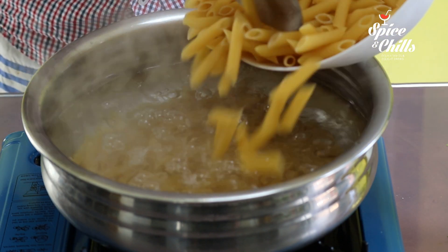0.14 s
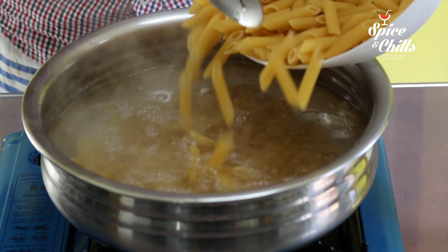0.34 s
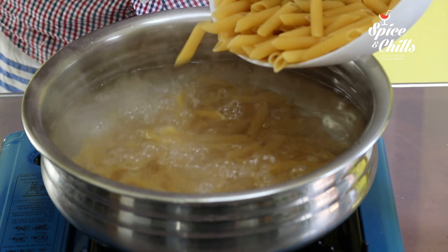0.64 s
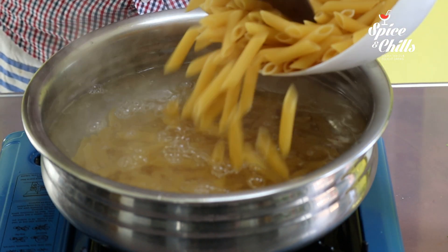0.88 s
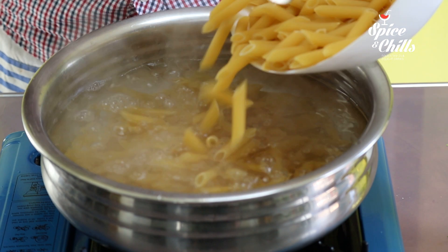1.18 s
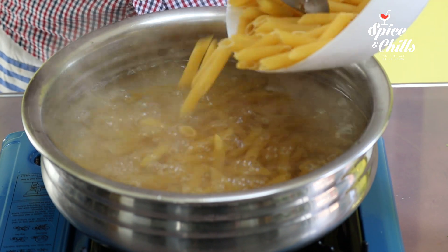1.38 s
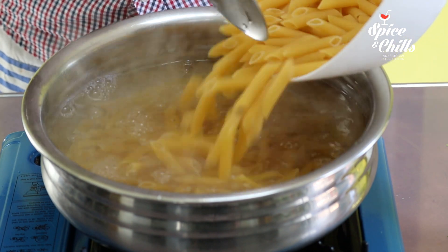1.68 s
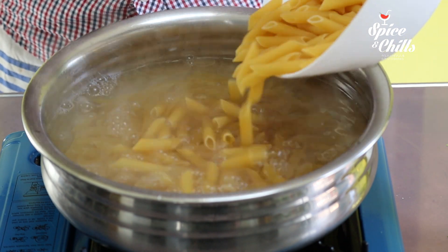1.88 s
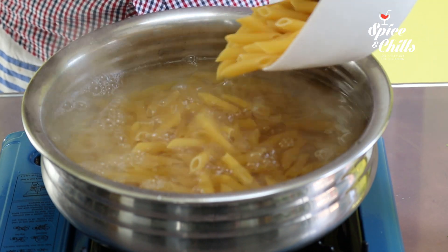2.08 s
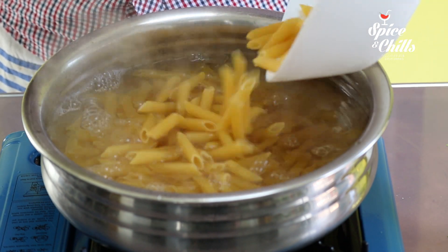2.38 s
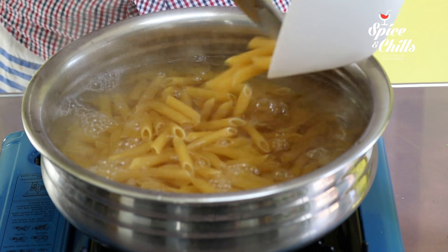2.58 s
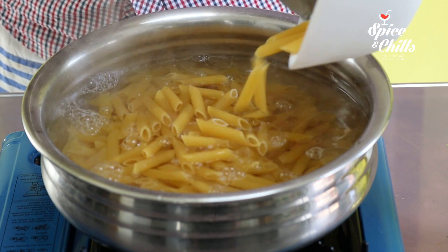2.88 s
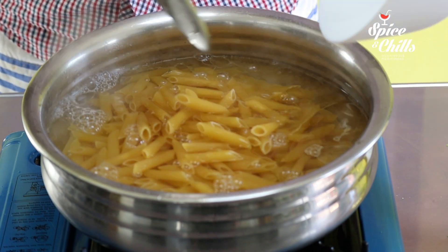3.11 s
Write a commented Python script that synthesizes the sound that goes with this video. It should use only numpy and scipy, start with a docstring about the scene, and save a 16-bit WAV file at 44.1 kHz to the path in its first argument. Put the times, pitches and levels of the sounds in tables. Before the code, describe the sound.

Dry pasta rattles, hollow and crisp, as a steel ladle pushes it into boiling water in waves from 0, 0.7 and 2.1 seconds. Bright irregular clinks and light splashes run over a faint low boil, with plops near 1.5-1.7 and short high squeaks around 2.5-2.8. Steel knocks ring at 2.6-2.7, and a strong one at 2.95 follows as pouring stops. Close microphone, hard-walled kitchen.

```python
"""Hard, hollow rattling in waves, bright steel ringing, splashes, plops and squeaks, and late steel knocks.
Dry penne is pushed with a steel ladle from a bowl into a steel pot of boiling water, in a hard-walled kitchen.
Random clicks through small resonators make the rattle and the splashes; modes struck by clicks make the steel.
Clear plops and short high squeaks are dying sines that rise in pitch; a noise tail that dies band by band
makes the room."""
import sys
import numpy as np
from scipy import signal
from scipy.fft import rfft, irfft
from scipy.io import wavfile

SR = 44100
rng = np.random.default_rng(int(sys.argv[2]) if len(sys.argv) > 2 else 0)


def dump_mix(stems):
    """Bounce the given channels to the path in sys.argv[1] as a 16-bit WAV at rate SR."""
    frames = np.atleast_2d(stems).T  # one column per channel
    limited = np.clip(frames, -1, 1)  # hard clip at full scale
    pcm = np.round(limited * 32767).astype(np.int16)
    wavfile.write(sys.argv[1], SR, pcm)


N = 143325
TIME = np.arange(N) / SR
STOP_S, STOP_DB_PER_S = 2.92, 110   # the last piece has fallen; slide and splash then die away at this rate

# Levels in the tables are relative; the mix gains of each layer come on top.
# pasta sliding out of the bowl, one list for each of three waves: (time [s], level [dB])
POUR_WAVES = [
    [(0.0, -24.5), (0.354, -25.5), (0.52, -38), (0.685, -30)],
    [(0.715, -22), (0.925, -21.5), (1.139, -17), (1.371, -36), (1.735, -22.5), (1.905, -25), (2.04, -33)],
    [(2.07, -29.5), (2.174, -21), (2.324, -24), (2.564, -34), (2.75, -26), (2.92, -47)],
]
# ringing modes of the steel ladle: (pitch [Hz], level [dB], T60 [s])
LADLE_MODES = [(2234, -16, 0.24), (2933, -4, 0.18), (3800, -10.5, 0.13), (4827, 0.5, .14), (5004, -3, 0.14),
               (6014, -5.5, 0.22), (7333, 1, .15), (7360, -1.5, 0.072), (7814, 1.5, 0.064),
               (8150, -4, 0.075), (8650, -1.5, 0.044), (8820, -13.5, 0.067), (10100, -10.5, 0.15),
               (11330, -14.5, 0.092), (11900, -27, 0.12), (12900, -17, 0.066), (13450, -43, .09)]
# colour of a hard crack on steel: (frequency [Hz], level [dB])
CRACK_COLOUR = [(30, -53), (150, -17), (340, -2.5), (600, -2.5), (1400, 5), (2500, 3.5), (5000, -1.5),
                (9000, 0), (16000, -19.5)]


def from_db(db):
    """Decibels to gain."""
    return 10 ** (np.asarray(db) / 20)


def rms_one(x):
    """Scale to rms 1."""
    return x / np.sqrt(np.mean(x ** 2) + 1e-20)


def at_hz(points, hz):
    """Read a table on a log-frequency axis."""
    f, value = np.transpose(points)
    return np.interp(np.log(hz + 1e-3), np.log(f), value)


def level(rows):
    """Gain over time from a level curve; it dies away once the pouring stops."""
    curve_db = np.interp(TIME, *np.transpose(rows))
    return from_db(curve_db - STOP_DB_PER_S * np.maximum(TIME - STOP_S, 0))


def colour(x, spectrum, size=4096):
    """Minimum-phase filter of unit energy with the given spectrum."""
    gain = from_db(at_hz(spectrum, np.linspace(0, SR / 2, size // 2 + 1)))
    cepstrum = irfft(np.log(gain))
    # folding the cepstrum onto positive times makes the response causal
    cepstrum[1:size // 2] *= 2
    cepstrum[size // 2 + 1:] = 0
    response = irfft(np.exp(rfft(cepstrum)))
    return signal.fftconvolve(x, response / np.linalg.norm(response))[:N]


def ring(x, hz, t60):
    """A two-pole resonator: a unit click sets a dying sine of height 1 ringing."""
    r = from_db(-60 / (t60 * SR))
    w = 2 * np.pi * min(hz, SR / 2) / SR
    return signal.lfilter([0, np.sin(w)], [1, -2 * r * np.cos(w), r * r], x + 1e-18)


def contacts(per_s, spread_db):
    """Random clicks of uneven size and random sign, rms 1."""
    sizes = from_db(spread_db * np.minimum(rng.exponential(1, N), 3))
    signs = rng.choice([-1, 1], N)
    happens = rng.random(N) < per_s / SR
    return rms_one(sizes * signs * happens)


def grains(clicks, low_hz, high_hz, cycles, count=48):
    """Each click rings one of many small resonators, which falls by 60 dB in a number of cycles; rms 1."""
    dealt = rng.integers(0, count, N)
    total = np.zeros(N)
    for k, hz in enumerate(np.geomspace(low_hz, high_hz, count)):
        total += hz * ring(clicks * (dealt == k), hz, cycles / hz)
    return rms_one(total)


def cluster(hz, count=4):
    """The close partials of one mode of an uneven steel shell."""
    half_width = .007   # share of the pitch, before the random shifts
    places = np.linspace(-1, 1, count) + rng.uniform(-.3, .3, count)
    return hz * (1 + half_width * places)


def struck(modes, times, db, uneven_db):
    """Blows on steel: the partials of a mode start in step, each with its own strength, and then beat."""
    out = np.zeros(N)
    at = (times * SR).astype(int)
    for hz, mode_db, t60 in modes:
        sign = rng.choice([-1, 1], len(times))
        for partial_hz in cluster(hz):
            clicks = np.zeros(N)
            strength_db = db + mode_db + uneven_db * rng.standard_normal(len(times))
            clicks[at] = sign * from_db(strength_db)
            out += ring(clicks, partial_hz, t60)
    return out / 2


def bursts(times, db, t60):
    """A short burst of noise at each time, dying exponentially."""
    clicks = np.zeros(N)
    clicks[(times * SR).astype(int)] = from_db(db)
    envelope = signal.lfilter([1], [1, -from_db(-60 / (t60 * SR))], clicks + 1e-18)
    return envelope * rng.standard_normal(N)


def kitchen(x, wet_db, first_s=.004, count=12):
    """Hard walls: the sound plus a diffuse noise tail that dies band by band."""
    # reverberation time of the room: (frequency [Hz], T60 [s])
    room_t60 = [(150, 0.23), (600, 0.59), (2000, 0.54), (5000, 0.83), (9000, .42), (15000, 0.24)]
    t, tail = TIME[:SR * 2 // 3], 0
    edges = np.geomspace(80, 18000, count + 1)
    for low, high in zip(edges, edges[1:]):
        band_filter = signal.butter(2, [low, high], "band", fs=SR, output="sos")
        band = signal.sosfilt(band_filter, rng.standard_normal(len(t)))
        decay = from_db(-60 * t / at_hz(room_t60, np.sqrt(low * high)))
        tail = tail + band * decay * (t > first_s)
    return x + from_db(wet_db) * signal.fftconvolve(x, tail / np.linalg.norm(tail))[:N]


def steady_boil():
    """Dense random clicks, filtered into the even rumble of boiling water."""
    # colour of the boil: (frequency [Hz], level [dB])
    boil_colour = [(20, -22), (55, -8.5), (110, -4.5), (175, 5), (260, -2.5), (550, -1), (1000, -3.5),
                   (2500, -12), (6000, -25), (10000, -22), (16000, -35)]
    return from_db(-43) * colour(contacts(per_s=5000, spread_db=1.5), boil_colour)


def splashes():
    """Swarms of small ringing bubbles; the air in the pot hums along at one resonance."""
    # pasta entering the water: (time [s], level [dB])
    splash_curve = [(0.0, -25.5), (0.11, -31.5), (0.82, -34), (1.02, -32), (1.14, -30.5), (1.96, -36.5),
                    (2.14, -34), (2.32, -33.5), (2.58, -31), (2.73, -48), (2.92, -40)]
    # colour of the splash: (frequency [Hz], level [dB])
    splash_colour = [(100, -23), (200, -3), (330, -4), (430, -10), (530, 0.5), (660, -5), (830, 3),
                     (1050, -3.5), (1400, 2), (2500, -8.5), (6000, -14.5)]
    bubbles = grains(contacts(per_s=450, spread_db=3.5), low_hz=285.8, high_hz=2550, cycles=18.7)
    spray = from_db(1) * contacts(per_s=1100, spread_db=-1.5)
    splash = rms_one(colour(bubbles + spray, splash_colour))
    hum = rms_one(ring(contacts(per_s=120, spread_db=3.5), hz=525.4, t60=0.13))
    return from_db(-0.5) * level(splash_curve) * (splash + from_db(-13.5) * hum)


def rising_tones(rows):
    """Each row sounds as a short dying sine that rises in pitch."""
    t60_s, rise_per_s, attack_s = 0.014, 2.2, 0.00047   # rise as a share of the first pitch
    out, t = np.zeros(N + SR), TIME[:SR // 10]
    attack = 1 - np.exp(-t / attack_s)
    for s, hz, db in rows:
        start = int(s * SR)
        decay = from_db(db - 60 * t / t60_s)
        tone = np.sin(2 * np.pi * hz * t * (1 + rise_per_s * t / 2))
        out[start:start + len(t)] += decay * attack * tone
    return out[:N]


def plops_and_squeaks():
    """Clear plops of bubbles near 3 kHz and short high squeaks of pasta at 8 to 9 kHz, all rising sines."""
    # the plops and squeaks: (time [s], first pitch [Hz], level [dB])
    tone_rows = [(1.331, 9390, -12.5), (1.538, 3304, -9.5), (1.675, 2770, -6.5), (1.696, 3010, -12.5),
                 (1.89, 2492, -15.5), (2.484, 2478, -15), (2.526, 2712, -12.5), (2.533, 8090, -14),
                 (2.54, 8300, -14), (2.653, 8600, -7.5), (2.782, 8900, -17.5), (2.7935, 9180, -12.5),
                 (2.862, 3240, -20), (2.879, 2520, -19), (2.887, 2800, -18.5)]
    return from_db(5) * rising_tones(tone_rows)


def gulps(count=400):
    """Air escapes from the sinking tubes as random bubbles, louder as more pasta falls."""
    per_s, low_hz, high_hz = 60, 1227, 3960
    loudest_db, range_db = 9, 22   # loudest bubble against the slide curve, and the spread below it
    wait, pitch, size = rng.random((count, 3)).T
    s = np.cumsum(-np.log(1 - wait)) / per_s
    hz = low_hz * (high_hz / low_hz) ** pitch
    db = np.interp(s, *np.vstack(POUR_WAVES).T) + loudest_db - range_db * (1 - size)
    return rising_tones(np.column_stack([s, hz, db])[s < STOP_S])


def pings():
    """A falling piece hits the pot wall and one mode rings alone."""
    # the hits: (time [s], pitch [Hz], level [dB])
    ping_rows = [(0.713, 4157, -20), (.755, 6350, -35), (2.11, 4103, -23)]
    out = np.zeros(N)
    for s, hz, db in ping_rows:
        click = np.arange(N) == int(s * SR)
        out += from_db(db) * ring(click, hz, t60=0.24)
    return out


def knocks():
    """The ladle strikes the pot: a noise crack and a low thud, with the modes of pot and ladle."""
    # the strikes: (time [s], pot ring [dB], ladle ring [dB], crack [dB])
    knock_rows = [(2.5944, -9, -7, -7), (2.605, -15, -6, -3), (2.6701, -1, -4, -4.5), (2.948, 3.5, -14, 0),
                  (2.9575, -9, -6, -23)]
    # ringing modes of the steel pot: (pitch [Hz], level [dB], T60 [s])
    pot_modes = [(343.4, -19.5, 0.19), (834, -17.5, 0.2), (1368, -4, 0.1), (1557, -10, 0.2),
                 (2045, -0.5, 0.32), (2096, -13, 0.41), (2130, -3.5, 0.41), (2839, -4.5, 0.37),
                 (3823, -0.5, 0.11), (4095, -9, 0.29), (4660, -1, 0.14), (5730, -10.5, 0.27),
                 (8600, -8, 0.29), (9000, -9.5, 0.52), (9800, -8, 0.39), (10950, -9, 0.18),
                 (12600, -13, .18), (14200, -7, 0.13)]
    # colour of the pot jolting on the stove: (frequency [Hz], level [dB])
    thud_colour = [(25, 0), (60, -1), (130, 0), (250, -2), (600, -26), (2000, -50)]
    s, pot_db, ladle_db, crack_db = np.transpose(knock_rows)
    pot = from_db(-23) * struck(pot_modes, s, pot_db, uneven_db=4.5)
    ladle = from_db(-19) * struck(LADLE_MODES, s, ladle_db, uneven_db=2.5)
    crack = from_db(-6.5) * colour(bursts(s, crack_db, t60=0.041), CRACK_COLOUR)
    thud = from_db(-39) * colour(bursts(s, pot_db, t60=0.024), thud_colour)
    return pot + ladle + crack + thud


def pushes():
    """Gains over time of ladle ring, rattle and crackle: each push starts and stops quickly."""
    # the ladle pushes a heap: (start [s], length [s], ladle ring [dB], rattle [dB], crackle [dB])
    stroke_rows = [(.0, 0.014, -22, -21.5, -30), (.11, 0.13, -27, -36, -39.5),
                   (.237, 0.071, -14.5, -17, -28), (0.335, 0.25, -31, -27, -62),
                   (0.705, 0.054, -53, -22, -31.5), (0.887, 0.15, -26, -37, -45),
                   (1.005, 0.19, -25, -35, -43), (1.273, 0.16, -27, -25, -35),
                   (1.449, .045, -25.5, -15.5, -26), (1.552, 0.095, -21, -26, -33),
                   (1.672, 0.031, -39, -20.5, -36), (1.763, 0.031, -36, -27.5, -37),
                   (1.83, 0.031, -23, -42, -41), (2.065, 0.16, -32, -35, -37.5),
                   (2.206, 0.073, -18.5, -38, -47), (2.327, 0.097, -27.5, -26.5, -28),
                   (2.437, 0.075, -25.5, -25, -35.5), (2.597, .065, -17, -37, -23.5),
                   (2.761, 0.046, -48, -41, -34), (2.866, .03, -52, -44, -43)]
    edge_s = .006
    rows = np.array(stroke_rows)
    start, length = rows[:, :1], rows[:, 1:2]
    inside_s = np.minimum(TIME - start, start + length - TIME)
    gates = np.clip(inside_s / edge_s + .5, 0, 1)
    return from_db(rows[:, 2:]).T @ gates


def ladle_strokes(push):
    """During each push, a stream of small contacts keeps the modes of the ladle ringing."""
    clicks = contacts(per_s=900, spread_db=1.5) * push
    hit = np.flatnonzero(clicks)
    hit_db = 20 * np.log10(np.abs(clicks[hit]))
    steel = struck(LADLE_MODES, hit / SR, hit_db, uneven_db=5)
    return from_db(-36) * steel + from_db(-11) * colour(clicks, CRACK_COLOUR)


def clinks():
    """Single hard pieces hit the ladle: a dull and a bright noise burst over its ringing modes."""
    # the hits: (time [s], ladle ring [dB], dull knock [dB], bright tick [dB])
    clink_rows = [(0.145, -8.5, -20, -29), (0.195, -12, -18, -39), (0.2373, -5.5, -19, -33),
                  (0.2936, -5, -11.5, -10), (0.3989, -16, -26, -20), (0.4468, -1.5, -19, -19),
                  (0.5326, -7, -16.5, -38), (0.5494, -35, -22, -27), (0.5705, -5.5, -19, -30),
                  (0.6513, -10.5, -18, -30), (0.6934, -20, -22, -23), (0.7032, -11, -12, -20.5),
                  (0.7494, -6, -18, -27), (0.9611, -5.5, -22, -44), (1.0773, -3, -14, -15.5),
                  (1.1217, -5.5, -29, -28), (1.1696, -9, -17.5, -21), (1.2799, -7, -13.5, -29),
                  (1.2934, -6, -18, -19), (1.3487, 0, -21, -21), (1.4525, -4.5, -19, -27),
                  (1.5593, -3, -34, -17), (1.6071, 0, -25, -18.5), (1.7832, -6.5, -13, -21),
                  (1.7992, -28, -19, -14.5), (1.8386, 2.5, -15.5, -17.5), (1.8557, -6, -20, -17),
                  (1.9509, -8, -18.5, -44), (2.0626, -10, -24.5, -23), (2.3375, -8, -21, -19.5),
                  (2.3614, -20, -17, -18), (2.3983, -11, -25, -19), (2.4497, -30, -22, -17)]
    # colour of the dull knock: (frequency [Hz], level [dB])
    dull_colour = [(50, -41), (150, -19), (600, 2.5), (1300, -3), (2900, 8.5), (5000, -0.5), (9000, -50),
                   (16000, -21)]
    # colour of the bright tick: (frequency [Hz], level [dB])
    bright_colour = [(100, -50), (1000, -27), (4000, -6), (8500, 4), (11000, -0.5), (16000, -24.5)]
    s, ring_db, dull_db, bright_db = np.transpose(clink_rows)
    steel = from_db(-23) * struck(LADLE_MODES, s, ring_db, uneven_db=5.5)
    knock = colour(bursts(s, dull_db, t60=0.037), dull_colour)
    tick = from_db(3) * colour(bursts(s, bright_db, t60=0.024), bright_colour)
    return steel + knock + tick


def snaps(per_s=78, uneven_db=4):
    """Sharp tips snap past each other: sparse, very short treble bursts, rms 1."""
    # colour of a snap: (frequency [Hz], level [dB])
    snap_colour = [(100, -45), (1000, -20), (4000, 3), (9500, 4), (12000, 2), (16000, -16)]
    when = np.flatnonzero(rng.random(N) < per_s / SR) / SR
    db = uneven_db * rng.standard_normal(len(when))
    return rms_one(colour(bursts(when, db, t60=0.014), snap_colour))


def pasta(rattle_push, crackle_push):
    """Hollow pieces click against each other and ring briefly; their sharp edges crackle."""
    # colour of the hollow rattle: (frequency [Hz], level [dB])
    rattle_colour = [(300, -29.5), (1000, -11), (1700, -9.5), (2200, 0), (3000, 0.5), (4200, -6.5),
                     (6500, -2.5), (8500, -25), (11000, -20), (16000, -21)]
    # colour of the treble crackle: (frequency [Hz], level [dB])
    crisp_colour = [(100, -45), (1000, -29), (4000, 26.5), (6500, -37), (8000, 9), (10000, 7.5),
                    (11500, -19), (13500, -8), (16000, -57)]
    clicks = contacts(per_s=600, spread_db=3.0)
    tubes = grains(clicks, low_hz=1664, high_hz=4540, cycles=34)
    rattle = rms_one(colour(from_db(-8.5) * tubes + clicks, rattle_colour))
    edges = contacts(per_s=450, spread_db=-1)
    edge_ring = from_db(16) * grains(edges, low_hz=6300, high_hz=12740, cycles=79)
    crackle = rms_one(colour(edges + edge_ring, crisp_colour))
    tips = from_db(-3) * crackle_push * snaps()
    # the steady slide runs under the separate pushes
    slide = level(np.vstack(POUR_WAVES))
    rattle_gain = from_db(-4) * slide + from_db(-7.5) * rattle_push
    crackle_gain = from_db(-15) * slide + crackle_push
    return rattle_gain * rattle + crackle_gain * crackle + tips


def scene():
    """All sources in the kitchen; the knocks excite the room a little more."""
    ring_push, rattle_push, crackle_push = pushes()
    water = steady_boil() + splashes() + gulps()
    ladle = ladle_strokes(ring_push) + clinks()
    pouring = water + plops_and_squeaks() + pings() + ladle + pasta(rattle_push, crackle_push)
    return (kitchen(pouring, wet_db=-5.5) + kitchen(knocks(), wet_db=-4))[None]


def record(dry):
    """Peaks beyond full scale are clipped; then a steep low-pass cuts the top."""
    cutoff_hz = 16000
    clipped = np.clip(dry, -1, 1)
    return signal.sosfilt(signal.ellip(12, .2, 80, cutoff_hz, fs=SR, output="sos"), clipped)


dry = scene()
out = record(dry)
dump_mix(out)
```